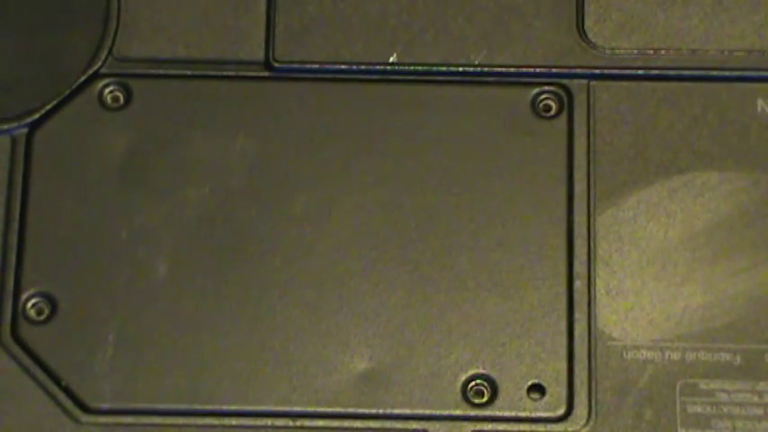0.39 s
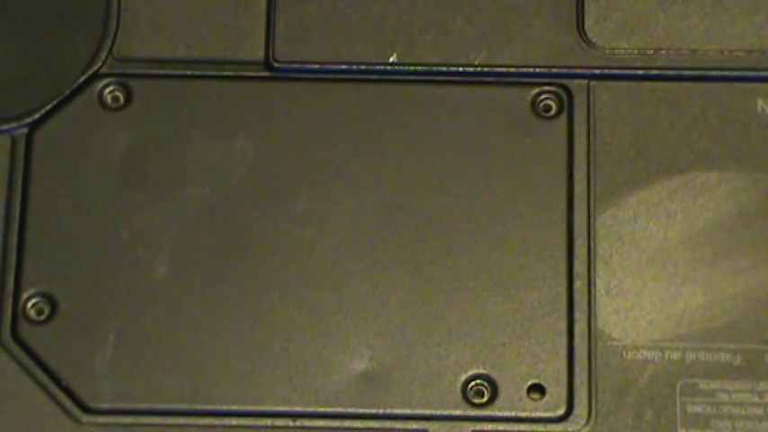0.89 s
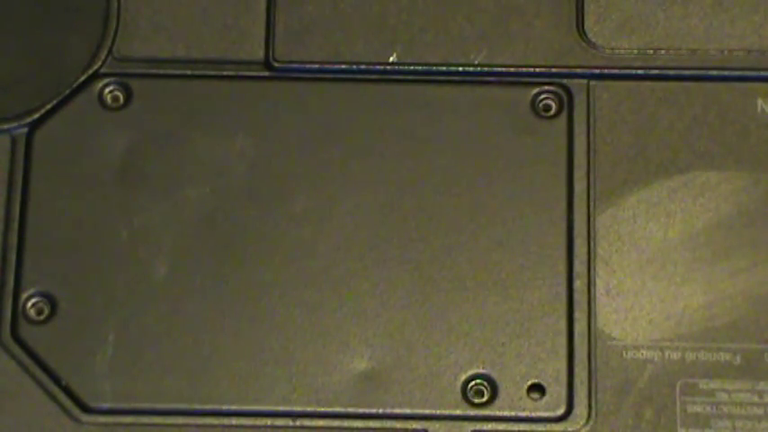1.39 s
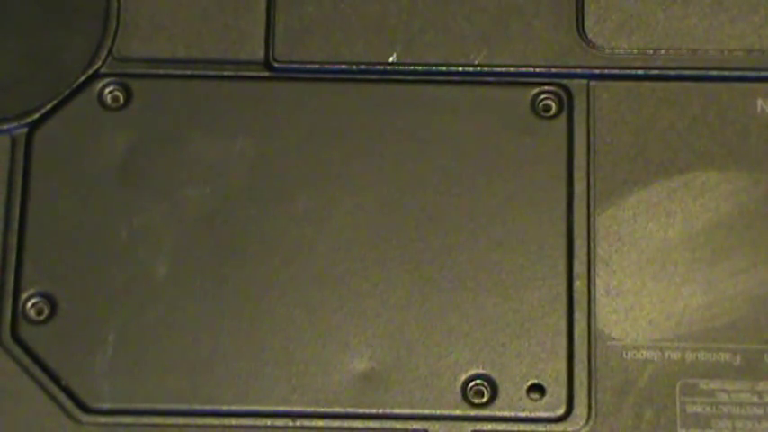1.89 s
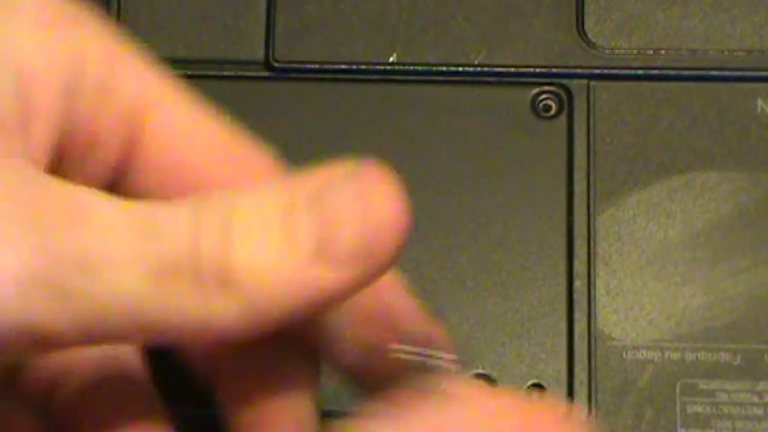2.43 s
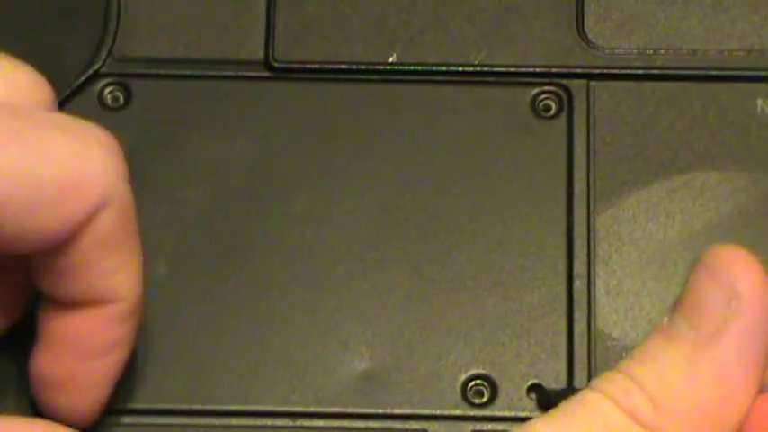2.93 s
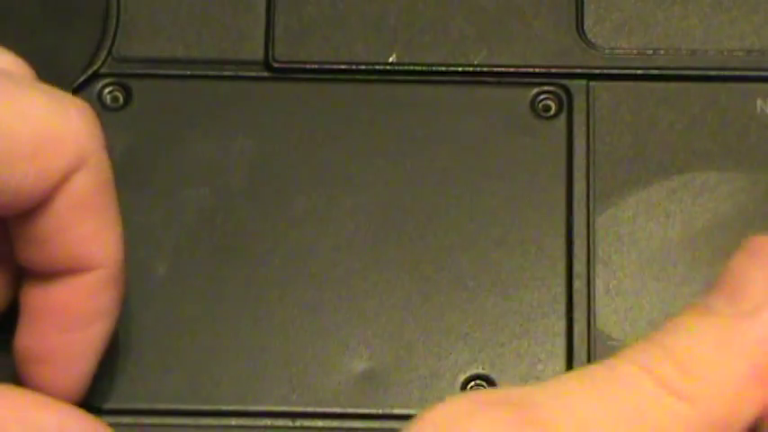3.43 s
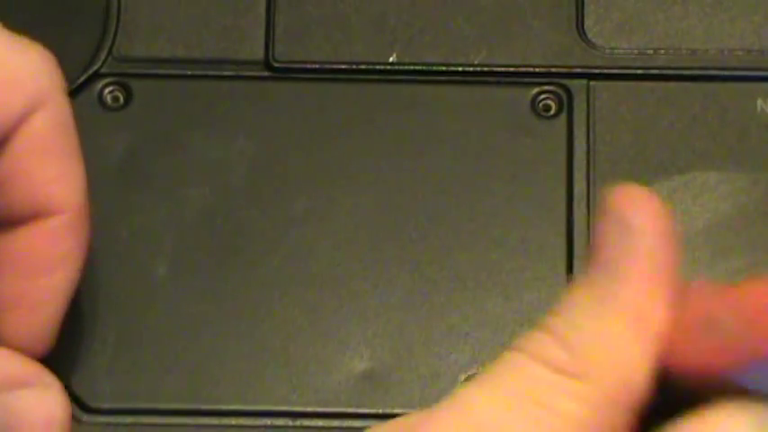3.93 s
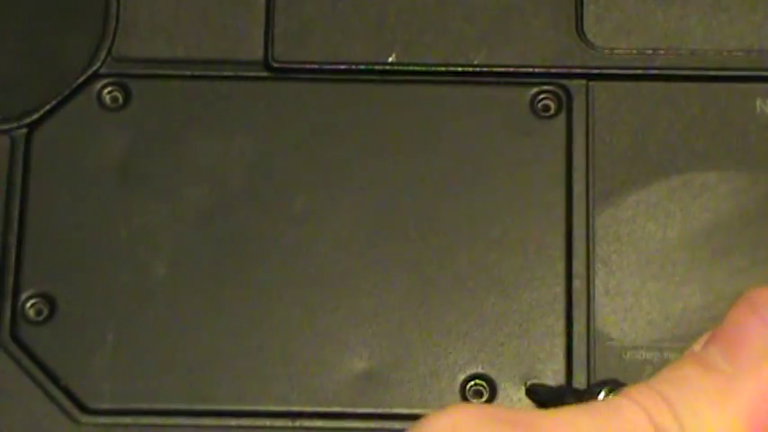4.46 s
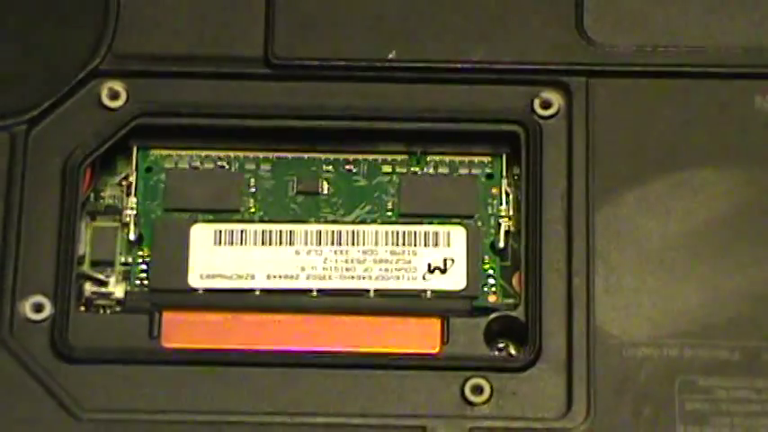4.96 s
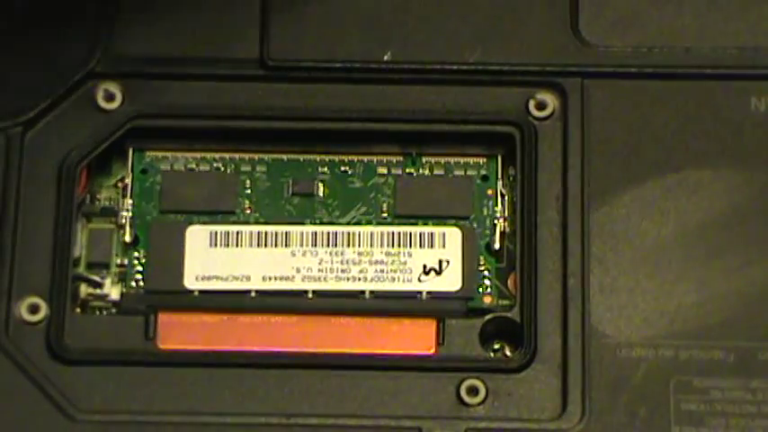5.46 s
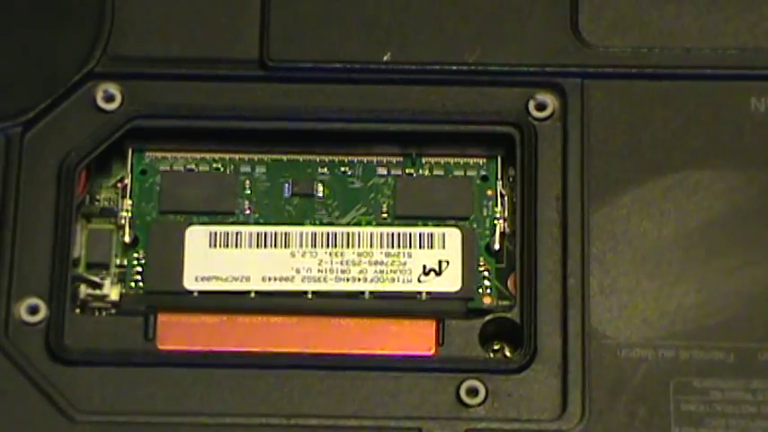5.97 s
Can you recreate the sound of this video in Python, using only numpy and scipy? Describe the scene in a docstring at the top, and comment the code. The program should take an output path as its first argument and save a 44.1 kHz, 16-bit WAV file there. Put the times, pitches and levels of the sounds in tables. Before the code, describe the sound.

Close up, a screwdriver clicks and rubs over faint hiss, light knocks follow, and a thin plastic cover snaps free and bounces noisily on a desk.

```python
"""Hands work on the underside of a laptop, close up, over microphone hiss, a motor hum and a thin high whine.
Loose parts shuffle to rest (coloured noise) as a steel screwdriver starts to tick (noise bursts, damped modes).
Strokes rub and sleeves rustle (gritty noise); after a second a dry screw squeaks (gliding, fuzzy tones).
From 3 s blows knock on a plastic cover plate (snaps, ringing modes); near 4.8 s it tears free with a rip, at
5 s it lands on the desk, then bounces and chatters to rest. A small room answers ticks and knocks."""
import sys
import numpy as np
from scipy import signal
from scipy.fft import rfft, irfft
from scipy.io import wavfile
from scipy.ndimage import map_coordinates

SR = 44100
rng = np.random.default_rng(int(sys.argv[2]) if len(sys.argv) > 2 else 0)


def dump(signal):
    """Clip the signal to [-1, 1] and save it as 16-bit WAV at the path in sys.argv[1]."""
    limited = np.clip(np.atleast_2d(signal).T, -1, 1)
    pcm = np.round(limited * 32767).astype(np.int16)
    wavfile.write(sys.argv[1], SR, pcm)


def how_loud(loudness_db):
    """Turn decibels into a plain amplitude multiplier (0 dB gives 1, 20 dB gives 10)."""
    steps = np.asarray(loudness_db, float) / 20
    return 10 ** steps


N = 269010  # length in samples

# Colour of the microphone hiss: f/Hz, relative level/dB per Hz
HISS_COLOUR = [(15, -17.5), (30, -14.5), (60, -12), (110, -11), (250, -10.5), (600, -15), (2150, -19),
               (3000, -20.5), (6000, -25), (15800, -23.5)]
# Left-right likeness of the hiss: f/Hz, correlation
HISS_LIKENESS = [(60, 1), (150, 0.89), (380, 0.17), (950, -0.14), (2380, -0.029), (5980, 0.31),
                 (15000, 0.69)]
# Motor hum: f/Hz, mean level/dB (rms)
MOTOR_HUM = (107.7, -63.5)
# Thin whine: f/Hz, level/dB (rms)
HIGH_WHINE = (15735, -77)
# Decay of the room: f/Hz, t60/s
ROOM_DECAY = [(150, 0.33), (600, 0.6), (2000, 0.24), (6000, 0.22), (14000, 0.31)]
# Colour of small parts settling: f/Hz, relative level/dB per Hz
SHUFFLE_COLOUR = [(120, -41), (200, -8.5), (427, -11.5), (485, 0), (721, -11), (1050, -1), (1220, -8),
                  (1810, -6.5), (2550, -28), (3010, -13), (4240, -9), (15000, -31)]
# Fade of the settling: starting level/dB, hold/s, t60/s
SETTLE_FADE = (-41.5, 0.042, 0.36)
# A screw turns dry: t/s where loudest, level/dB there, f/Hz there, glide/Hz per s
SCREW_SQUEAKS = [(1.242, -62, 9560, -1500), (1.312, -59, 9850, 2000), (2.245, -67, 13450, 9000),
                 (2.285, -65, 13050, -13000)]
# Rustle of hands and sleeves: t/s, dull level/dB, bright level/dB (both before the crest allowance)
SLEEVE_RUSTLE = [(0.2, -55.5, -59.5), (0.4, -64, -68), (0.94, -67, -61.5), (1.36, -67.5, -63),
                 (1.59, -66, -67), (1.82, -73.5, -64), (2.22, -58, -55), (2.37, -59.5, -59.5),
                 (2.51, -58.5, -50), (2.82, -65.5, -57), (3.06, -62.5, -61), (3.21, -60, -55.5),
                 (3.38, -57.5, -63), (3.67, -64.5, -60), (4.27, -65, -63), (4.41, -52, -59),
                 (4.64, -60.5, -55), (4.7, -60.5, -52)]
# Rubbing strokes: t/s, level/dB (before the crest allowance), dull part over bright/dB
RUB_STROKES = [(.5614, -44, -28), (1.1794, -46.5, -24), (1.2614, -42.5, -25), (1.82, -37.5, -34),
               (2.175, -43, -17), (2.305, -39, -13), (2.758, -42, -14), (3.116, -50, 6),
               (3.1562, -44, -31.5), (3.501, -42.5, -4.5), (3.854, -42.5, -18), (4.0394, -50, -11),
               (4.2623, -39, -4), (4.6464, -40, -15), (4.767, -35.5, -8), (4.84, -33, 1.5),
               (4.9494, -43, -23), (5.0277, -23, 5), (5.06, -32, 13.5), (5.163, -38, 3)]
# The edge tears out of its clips: t/s, level/dB (as above), dull part over bright/dB, hold/s, t60/s
CLIP_RIP = (4.806, -18, -6.5, 0.027, 0.045)
# Colour of bright rubbing: f/Hz, relative level/dB per Hz
GRIT_COLOUR = [(710, -20), (1200, -9.5), (2590, -5), (3140, -4.5), (4150, -6), (9270, -9), (12000, -14),
               (15500, -24)]
# Push of dull rubbing on the plate, before its resonances: f/Hz, relative level/dB per Hz
DRAG_COLOUR = [(100, -50), (200, -3.5), (330, 5), (800, -8.5), (1600, -6.5), (3000, -21.5), (6000, -45)]
# Steel-on-steel ticks: t/s, level/dB before the tick-ring mix, f/Hz of the hardest-struck ring,
# low part of the burst/dB, top part of the burst/dB
STEEL_TICKS = [(0.0164, -23, 4530, -16, -30), (0.038, -25, 4430, -17, -30), (0.0576, -26.5, 4430, -7, -42),
               (0.3514, -41, 4510, -22, -5), (0.3574, -19, 10000, -20, 2), (0.3657, -27, 9000, -13, -16),
               (0.3756, -26, 7520, -28, -18), (0.4224, -38, 9430, -11, 2),
               (0.4367, -20.5, 10300, -22.5, -10.5), (0.55, -9.5, 6860, -17, -10.5),
               (0.592, -28, 5300, -34.5, -23), (0.6025, -33.5, 6900, -6, -17),
               (0.8123, -13.5, 6300, -25, -15), (1.0893, -35.5, 6550, -27, -13),
               (1.1399, -25, 6400, -27.5, -29), (1.27, -30, 4220, -26, -32), (1.2905, -33, 6240, -26, -24),
               (1.3105, -30.5, 6200, -29, -23), (1.917, -22, 10000, -18, -8),
               (1.9394, -38.5, 5590, 19, -23), (2.1577, -14.5, 5670, -14, -21),
               (2.544, -42, 3910, -15, -19), (3.5449, -30.5, 9100, -22, -11), (3.9463, -34.5, 5100, 10, -1)]
# Modes of the screwdriver: f/Hz, level/dB before scatter, undamped t60/s
STEEL_MODES = [(2614, -0.5, 0.015), (3056, -19, 0.028), (4630, 4, 0.013), (5910, -0.5, 0.036),
               (6504, 5, 0.014), (7410, -14.5, .014), (8240, 0.5, 0.037), (9410, 12, 0.0061),
               (10300, 9, 0.0049), (11490, -27, 0.0033), (14040, -48, 0.0053)]
# Side of the ticks, lower rings from the left: ring f/Hz, mean left over right/dB
TICK_PAN = [(6500, 3.6), (10000, 0.4)]
# The desk gives: t/s, level/dB before attack and pan, f/Hz, t60/s
DESK_THUMPS = [(4.796, -15.5, 212, 0.029), (4.802, -17, 150, 0.053), (5.018, -38, 200, 0.097),
               (5.306, -11.5, 137, 0.033), (5.487, -25.5, 204, 0.06), (5.979, -36, 126, 0.037),
               (5.995, -36, 126, 0.037)]
# Blows on the plate: t/s, snap peak level/dB before pan, clack over snap/dB, thud over snap/dB, clack f/Hz
PLATE_BLOWS = [(3.0128, -35, 3, -15.5, 1990), (3.0194, -39, 2.5, -15, 1300), (3.1117, -57, 6, -6, 1220),
               (3.1207, -50.5, 12, 7.5, 1230), (3.1348, -39, 8.5, -1.5, 1360),
               (3.2638, -44.5, 10, 9.5, 847), (3.337, -47, 0.6, -8, 1400), (3.3705, -42, -1.5, 0.6, 840),
               (3.4293, -46, 1.5, -1.5, 800), (3.4974, -42.5, 7.5, 1.5, 775), (3.5525, -50, 4, -13, 1610),
               (3.9212, -52, 3, -2, 1770), (4.0234, -42.5, -0.6, 3, 820), (4.2244, -31.5, -3, -9.5, 2100),
               (4.2323, -36, -7, -3.5, 1940), (4.3256, -48.5, 6, -4, 789), (4.3508, -52.5, 11, 4, 791),
               (4.4107, -46, 12, 5, 800), (4.7617, -32, -10, -8, 1210), (4.7707, -35.5, -16, -7, 1710),
               (4.7969, -17.5, -5, -4, 1100), (4.808, -12, -12, -19, 1140), (4.8177, -12.5, 1.5, -38, 1100),
               (4.8285, -14, -0.6, -38, 1150), (4.844, -25, -8, -30, 1610), (5.0165, -9, -1.5, -8.5, 1400),
               (5.0226, -16, 2.5, 1.5, 1130), (5.0467, -30, 8, 9, 762), (5.066, -38, 12, 15, 762),
               (5.088, -40, 12, 15, 980), (5.1626, -32, 12.5, 11.5, 1180), (5.1832, -21, -0.6, -11, 1500),
               (5.3048, -10.5, -19, -8, 929), (5.3121, -14, 0.6, -5.5, 1610),
               (5.3623, -22.5, -0.6, -4.5, 1300), (5.4053, -26, -4.5, -6, 1310),
               (5.4234, -11.5, -3, -10, 1610), (5.488, -13.5, -9, -5, 830), (5.5179, -21, -1.5, -5, 1390),
               (5.5318, -16, -12, -11, 1610), (5.5448, -26, -1.5, -5, 1430),
               (5.5847, -11.5, -0.6, -14.5, 1610), (5.665, -22.5, -6, -7.5, 1750),
               (5.7252, -27.5, -0.6, -13, 1650), (5.7575, -41.5, -6, -4, 880),
               (6.0702, -39, -15, -19, 1680)]
# Colour of a hard contact on plastic: f/Hz, relative level/dB
SNAP_COLOUR = [(1200, -49), (2500, -7.5), (3200, 2.5), (5000, 0.5), (8300, -3.5), (12000, -6.5),
               (16000, -21)]
# Modes of the plate on its support: f/Hz, level/dB before scatter, undamped t60/s
PLATE_MODES = [(145.5, -6.5, 0.2), (184, -6, 0.15), (265, -4, 0.24), (317, -9, 0.22), (342.4, -14.5, 0.45),
               (355, -6.5, 0.2), (440, -3, 0.088), (520, -16, 0.18), (641, 6, 0.037), (826, -7, 0.098),
               (984, -4, 0.042), (1094, -5, 0.045), (1185, -3.5, 0.043), (1400, -2, 0.027),
               (1610, -3, 0.067), (1800, -10, 0.093), (2050, 3.5, 0.011)]
# Clipped in, tearing free, landing flat, rocking on its edges: from t/s, central thud f/Hz, its spread/octaves,
# lowest free mode f/Hz, share of undamped t60 in the middle modes, the same in the low modes
PLATE_STAGES = [(0, 520, 0.3, 250, 0.5, 0.27), (4.7, 200, 0.1, 100, 0.4, 0.4),
                (5.0, 340, 0.06, 160, 0.55, 0.46), (5.25, 360, 0.35, 160, 0.68, 0.33)]
# Response of the microphones: f/Hz, level/dB
MICROPHONE_RESPONSE = [(15, -4), (50, -1.5), (110, -1.5), (200, -1), (15800, -3), (16100, -29), (17500, -37)]

LANDS_S = 5.0  # the plate reaches the desk
MIDDLE_FROM_HZ = 700  # plate modes above this clack, those below thud
RUB_RISE_S, RUB_T60_S = 0.006, 0.24
# chatter after a blow: level over the snap, dull part over bright
RATTLE_DB, RATTLE_DULL_DB, RATTLE_T60_S = -19, 2.5, 0.3
SQUEAK_SWELL, SQUEAK_FADE = 250, 170  # dB per s
# left over right; the wanders are standard deviations
PLATE_PAN_DB, PLATE_WANDER_DB, BASS_LEFT_DB, TOOL_WANDER_DB = 0.4, 0.9, 3.8, 0.8


def unit(x):
    """Scales a sound to rms 1."""
    return x / np.sqrt(np.mean(x ** 2) + 1e-20)


def along(points, hz):
    """Reads a curve of (f/Hz, value) points on a log frequency axis."""
    f, v = np.transpose(points)
    return np.interp(np.log(hz + 1), np.log(f + 1), v)


def wobble(rate):
    """A smooth random curve, rate knots a second."""
    knots = rng.standard_normal(int(N * rate / SR) + 4)
    return map_coordinates(knots, [np.arange(N) * rate / SR])


def rush(spectrum, alike, grain_db=0, grain_rate=300):
    """Coloured stereo noise of rms 1; its level flickers like grit under a tip."""
    hz = np.fft.rfftfreq(N, 1 / SR)
    turn = np.arccos(np.clip(along(alike, hz), -1, 1)) / 2  # mid-side balance that gives the likeness
    pair = rng.standard_normal((2, N)) * how_loud(grain_db * wobble(grain_rate))
    coloured = rfft(pair) * how_loud(along(spectrum, hz))
    mid, side = irfft(coloured * [np.cos(turn), np.sin(turn)], N)
    return unit(np.array([mid + side, mid - side]))


def crack(spectrum, t60, attack):
    """The contact itself: a coloured burst of noise a few ms long, peak 1."""
    t = np.arange(SR // 5) / SR
    hz = np.fft.rfftfreq(len(t), 1 / SR)
    noise = irfft(rfft(rng.standard_normal(len(t))) * how_loud(along(spectrum, hz)), len(t))
    sound = noise * how_loud(-60 * t / t60) * (1 - np.exp(-t / attack))
    return sound / np.abs(sound).max()


def ring(modes, lead_hz, lead_db, scatter_db, detune, attack, damping=1):
    """One blow: each mode at a new strength and slightly new pitch, those near lead_hz struck hardest; peak 1."""
    hz, db, t60 = np.transpose(modes)[:, :, None]
    t = np.arange(SR // 5) / SR
    level, pitch, sign = rng.standard_normal((3, len(modes), 1))
    db = db + scatter_db * level + lead_db * np.exp(-(np.log(hz / lead_hz) / 0.15) ** 2)
    decay = how_loud(db - 60 * t / (t60 * damping))
    waves = np.sign(sign) * decay * np.sin(2 * np.pi * hz * (1 + detune * pitch) * t)
    sound = waves.sum(0) * (1 - np.exp(-t / attack))
    return sound / np.abs(sound).max()


def add(out, s, sound, pan_db):
    """Places a sound at a time and a side; positive pan is left."""
    at = max(round(s * SR), 0)
    out[:, at:at + len(sound)] += sound * how_loud([[pan_db / 2], [-pan_db / 2]])


def hiss():
    """Microphone hiss: steady coloured noise, its left-right likeness set by frequency."""
    return how_loud(-58.5) * rush(HISS_COLOUR, HISS_LIKENESS)


def motor_hum():
    """A motor hums: one low sine, slightly unsteady in level and phase, a touch to the left."""
    hz, db = MOTOR_HUM
    t = np.arange(N) / SR
    level = np.sqrt(2) * how_loud(db + 1.2 * wobble(11))
    return level * np.sin(2 * np.pi * hz * t + 0.5 * wobble(6)) * how_loud([[0.6], [-0.6]])


def whine():
    """A thin high sine of steady level whose phase drifts a little."""
    hz, db = HIGH_WHINE
    t = np.arange(N) / SR
    return np.sqrt(2) * how_loud(db) * np.sin(2 * np.pi * hz * t + 0.67 * wobble(4))


def room(x):
    """Each frequency of the echo dies at its own speed; every short stretch gets its own tail."""
    out, step = np.zeros((2, N + SR)), SR // 8
    delay = 300  # samples
    for at in range(0, N, step):
        hz, t, z = signal.stft(rng.standard_normal((2, SR // 2)), SR, nperseg=256)
        decay = how_loud(-60 * t / along(ROOM_DECAY, hz)[:, None])
        tail = signal.istft(z * decay, SR, nperseg=256)[1][:, :SR // 2]
        tail = tail + 0.12 * tail[::-1]  # each side leaks a little into the other
        tail = tail / np.linalg.norm(tail[0])
        echo = signal.fftconvolve(x[None, at:at + step], tail, axes=1)
        out[:, at + delay:at + delay + echo.shape[1]] += echo
    return out[:, :N]


def settling():
    """Loose parts, just set down, shuffle and come to rest: grainy noise that holds, then dies."""
    db, hold, t60 = SETTLE_FADE
    age = np.clip(np.arange(N) / SR - hold, 0, None)
    return how_loud(db - 60 * age / t60) * rush(SHUFFLE_COLOUR, [(1000, 0.91)], grain_db=1, grain_rate=160)


def squeak():
    """Faint, fuzzy whistles of stick and slip: each swells, glides and fades."""
    t, out = np.arange(N) / SR, 0
    for s, db, hz, glide in SCREW_SQUEAKS:
        age = t - s  # negative while it swells
        phase = 2 * np.pi * (hz * age + glide * age ** 2 / 2) + 1.6 * wobble(550)  # fast wobble makes the fuzz
        level_db = db + np.minimum(SQUEAK_SWELL * age, -SQUEAK_FADE * age)
        out = out + how_loud(level_db + 2.7 * wobble(61)) * np.sin(phase)
    return out


def through_plate(x, blur, direct):
    """Noise driving the plate takes on its modes, widened by sliding contact; a share passes uncoloured."""
    f = np.fft.rfftfreq(N, 1 / SR)
    response = direct
    for hz, db, t60 in PLATE_MODES:
        width = blur * np.log(1000) / (np.pi * t60)  # bandwidth in Hz
        response = response + how_loud(db) * 1j * f * width / (hz * hz - f * f + 1j * f * width)
    return unit(irfft(rfft(x) * response, N))


def rubbing():
    """Strokes, rip, chatter and rustle: gritty noise, bright in air and dull through the plate."""
    t = np.arange(N) / SR
    s, dull_db, bright_db = np.transpose(SLEEVE_RUSTLE)
    dull, bright = how_loud(np.interp(t, s, dull_db)), how_loud(np.interp(t, s, bright_db))
    rubs = [(*row, 0, RUB_T60_S) for row in RUB_STROKES]
    # the landed plate chatters on after each snap
    rattles = [(s, db + RATTLE_DB, RATTLE_DULL_DB, 0, RATTLE_T60_S)
               for s, db, *_ in PLATE_BLOWS if s > LANDS_S]
    for start, db, drag_db, hold, t60 in rubs + rattles + [CLIP_RIP]:
        age = np.clip(t - start, 0, None)
        fade = how_loud(db - 60 * np.clip(age - hold, 0, None) / t60)
        stroke = fade * (1 - np.exp(-age / RUB_RISE_S))
        bright = np.hypot(bright, stroke)  # levels add as power
        dull = np.hypot(dull, how_loud(drag_db) * stroke)
    grit = rush(GRIT_COLOUR, [(1000, 0.47)], grain_db=1.9, grain_rate=250)
    push = rush(DRAG_COLOUR, [(300, 0.9)], grain_db=1.5, grain_rate=90)
    drag = through_plate(push, blur=1.3, direct=0.3)
    crest = 1.62  # allowance for the swing of a stroke over its steady level
    return (bright * grit + dull * drag * how_loud([[1.5], [-1.5]])) / crest


def screwdriver():
    """Dry, broad ticks; the hand chokes the ring of the steel almost at once."""
    out = np.zeros((2, N + SR))
    for s, db, lead_hz, low_db, top_db in STEEL_TICKS:
        colour = [(300, low_db - 36), (900, low_db - 14.5), (2600, low_db),
                  (5500, -12), (10500, top_db), (16000, top_db - 15)]
        tick = crack(colour, t60=0.0065, attack=0.0007)
        steel = ring(STEEL_MODES, lead_hz, lead_db=7, scatter_db=3, detune=0.03, attack=0.0004, damping=0.55)
        pan_db = rng.normal(along(TICK_PAN, lead_hz), TOOL_WANDER_DB)
        add(out, s, how_loud(db) * (0.72 * tick + 0.36 * steel), pan_db)
    return out[:, :N]


def desk():
    """Heavy blows push the desk top: a low, quickly dying swing, stronger on the left."""
    out, t = np.zeros((2, N + SR)), np.arange(SR // 5) / SR
    for s, db, hz, t60 in DESK_THUMPS:
        swing = how_loud(db - 60 * t / t60) * np.sin(2 * np.pi * hz * t)
        add(out, s, swing * (1 - np.exp(-t / 0.0042)), 6)
    return out[:, :N]


def plate():
    """Each blow snaps, then rings middle and low modes by how and where it lands; clips and fingers damp them."""
    out = np.zeros((2, N + SR))
    middle = [m for m in PLATE_MODES if m[0] > MIDDLE_FROM_HZ]
    for s, db, clack_db, thud_db, clack_hz in PLATE_BLOWS:
        stage = [row for row in PLATE_STAGES if row[0] <= s][-1]
        _, centre_hz, spread, lowest_hz, free, free_low = stage
        low = [m for m in PLATE_MODES if lowest_hz < m[0] < MIDDLE_FROM_HZ]
        thud_hz = centre_hz * 2 ** rng.normal(0, spread)
        pan_db = rng.normal(PLATE_PAN_DB, PLATE_WANDER_DB)
        snap = crack(SNAP_COLOUR, t60=0.011, attack=0.00016)
        clack = ring(middle, clack_hz, lead_db=8, scatter_db=3, detune=0.015, attack=0.0005, damping=free)
        thud = ring(low, thud_hz, lead_db=10, scatter_db=3, detune=0.012, attack=0.0008, damping=free_low)
        add(out, s, how_loud(db) * (snap + how_loud(clack_db) * clack), pan_db)
        # the desk carries the bass toward the left microphone
        add(out, s, how_loud(db + thud_db) * thud, pan_db + BASS_LEFT_DB)
    return out[:, :N]


def scene():
    """Mixes all sources; ticks and knocks also feed the room."""
    background = hiss() + motor_hum() + whine()
    ticks = screwdriver()
    knocks = desk() + plate()
    echo = room(how_loud(-12.5) * ticks.mean(0) + how_loud(-10.5) * knocks.mean(0))
    return background + echo + settling() + squeak() + rubbing() + ticks + knocks


def roll_off(x):
    """The treble ends steeply here."""
    return signal.sosfilt(signal.butter(12, 16990, fs=SR, output="sos"), x)


def record(dry):
    """The microphones lose some of the deepest bass and most of the extreme treble."""
    hz = np.fft.rfftfreq(N, 1 / SR)
    heard = irfft(rfft(dry) * how_loud(along(MICROPHONE_RESPONSE, hz)), N)
    return roll_off(heard)


dry = scene()
out = record(dry)
dump(out)
```